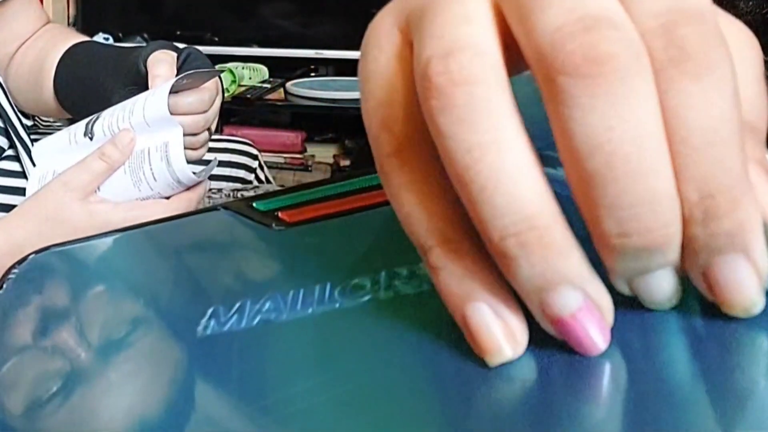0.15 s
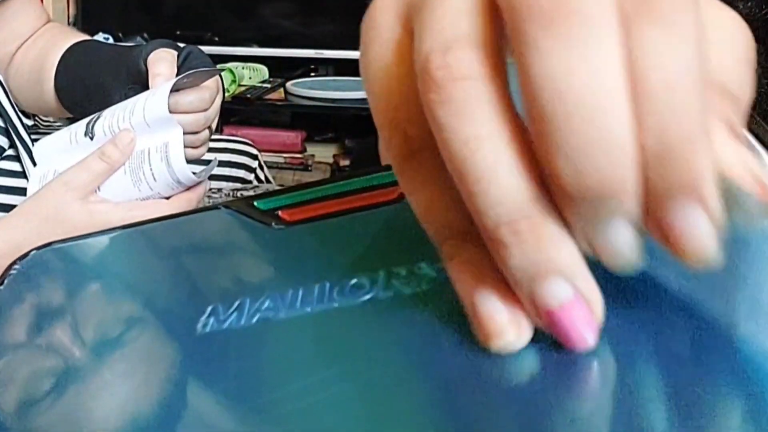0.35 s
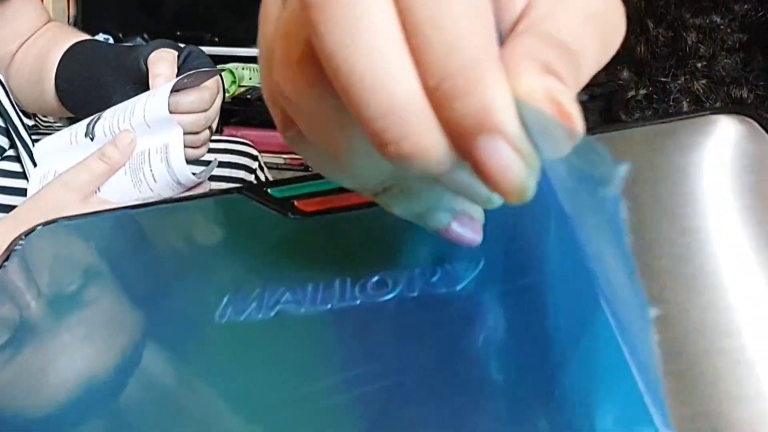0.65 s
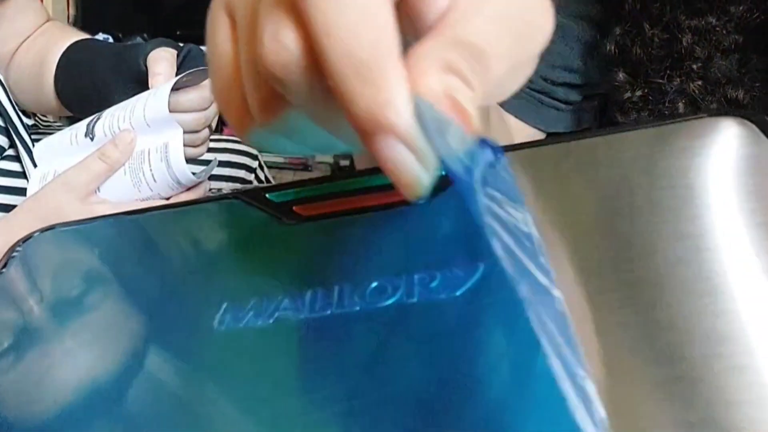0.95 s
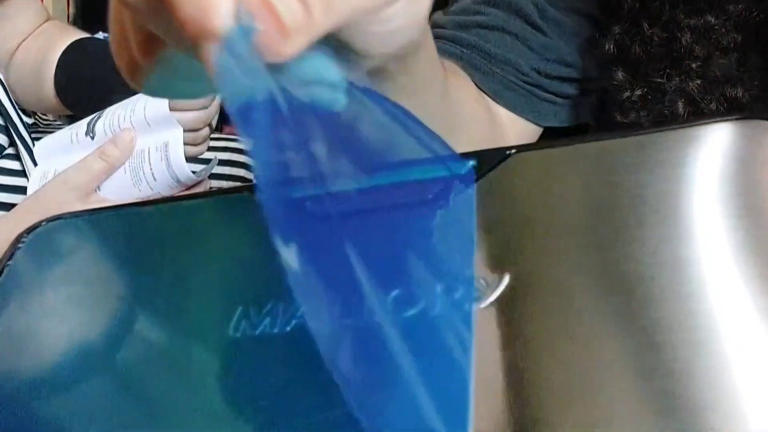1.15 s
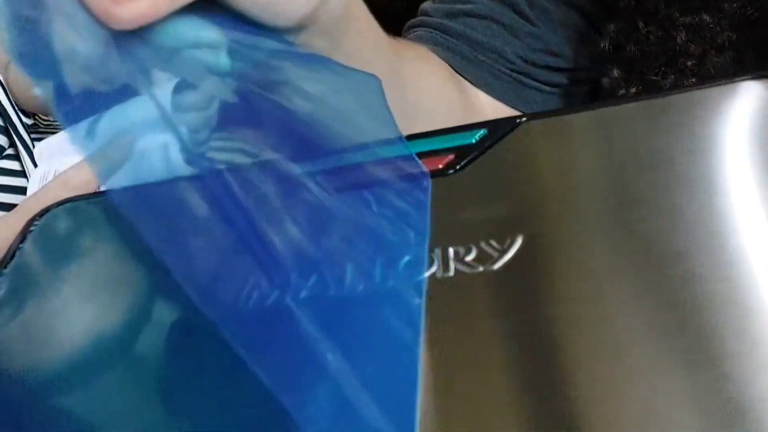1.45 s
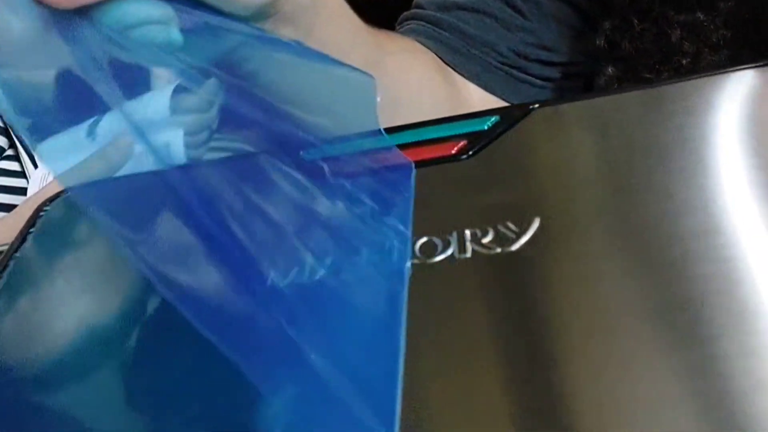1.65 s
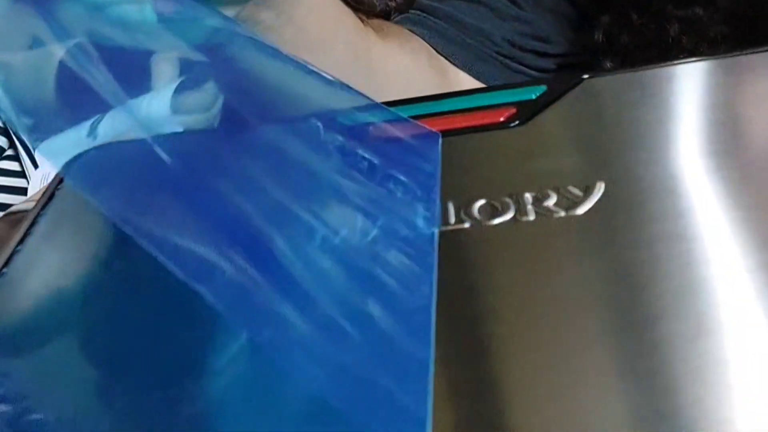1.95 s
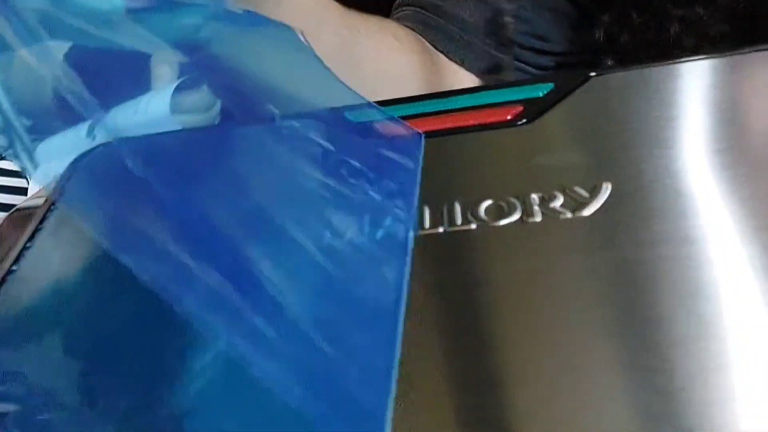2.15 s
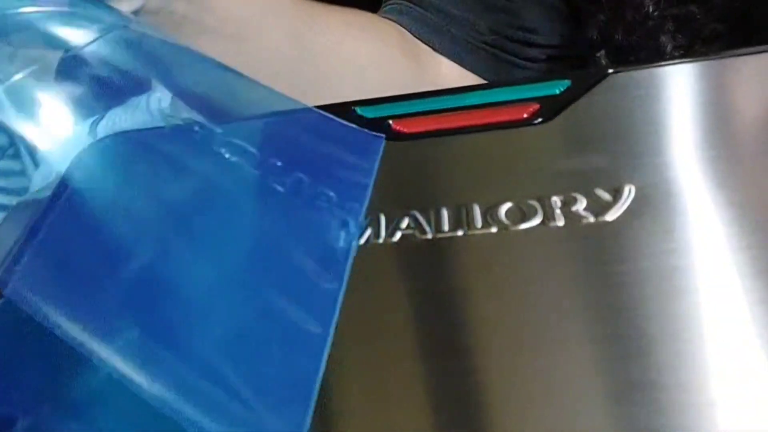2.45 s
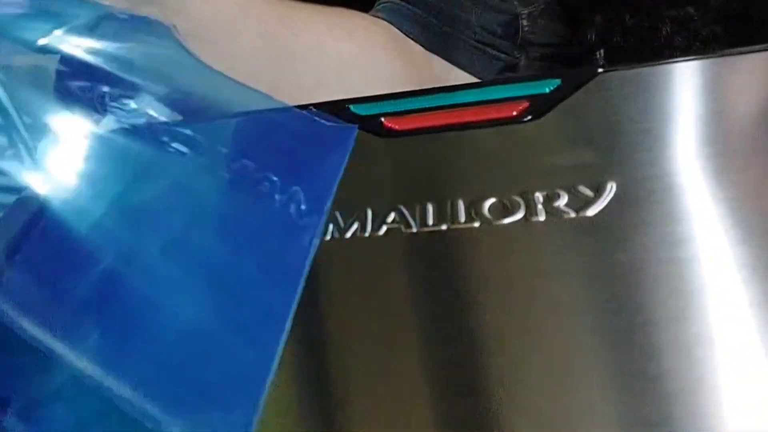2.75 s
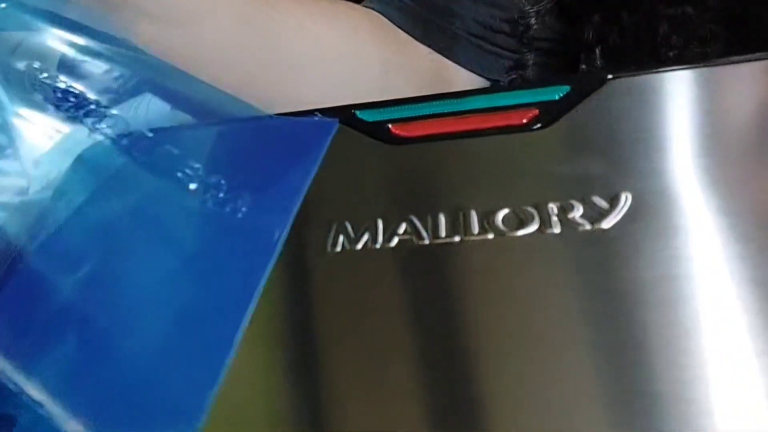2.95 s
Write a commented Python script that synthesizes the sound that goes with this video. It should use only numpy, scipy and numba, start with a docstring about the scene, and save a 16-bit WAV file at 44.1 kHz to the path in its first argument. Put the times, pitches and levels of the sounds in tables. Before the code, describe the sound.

Plastic film peels off a steel lid, close and dry in a small room. Crisp snaps from 0.1 s thicken into two quick, bright rips until 0.5 s, with a soft low thump near 0.35. After a quiet gap, a long crackling, zippy pull runs 0.9-1.4 s, falling in pitch, then a duller one to 1.85. Another rip comes at 2.1-2.5, ticking creep follows, and a final, more ringing pull spans 2.7-3.0.

```python
"""Plastic film is peeled off a steel lid, close to the microphones in a small room.
Single snaps come first, then two quick pulls and a soft thump of the lid; two long pulls follow after a pause.
A fifth pull leads to creeping with more snaps, and a sixth ends the peel. Noise makes the crackle of the glue,
moving resonators ring the lifted sheet, and the balance drifts from right of centre to slightly left.
Faint steel ringing and reflections follow the film, over a low boom of the lid and quiet room noise."""
import sys
import numpy as np
from scipy import signal
from scipy.fft import rfft, irfft, next_fast_len
from scipy.io import wavfile
from scipy.ndimage import map_coordinates
from numba import njit

SR = 44100
rng = np.random.default_rng(int(sys.argv[2]) if len(sys.argv) > 2 else 0)


def digitize_waveform(pressure):
    """Quantize a signal to 16-bit integers and store it at the path in sys.argv[1].

    Rows of a 2-D input are taken as channels; values are limited to [-1, 1].
    """
    field = np.atleast_2d(pressure).T
    bounded = np.clip(field, -1, 1)
    quanta = np.round(bounded * 32767).astype(np.int16)
    wavfile.write(sys.argv[1], SR, quanta)


N = 136710
T = np.arange(N) / SR  # time of each sample in seconds

# The pulls on the film. Each row: start in seconds, end in seconds, attack in seconds, release in seconds,
# level in dB, change of level over the pull in dB, crackle peak in Hz and in dB at the start,
# crackle peak in Hz and in dB at the end, treble in dB.
PULLS = [(.23,0.277,0.00085,.037,-24.5,4.5,4800,3,4800,6,19.5),(0.33,.517,0.021,0.035,-21.5,-14.5,3270,5.5,3680,3.5,6.5),(0.924,1.416,0.0055,0.04,-30,-1,5350,3,3220,2,5.5),(1.418,1.86,.15,0.011,-27.5,-7,2720,-4,2810,-3,2.5),(2.068,2.48,0.0085,0.052,-31,0,6200,3.5,2740,7.5,3),(2.686,3.022,0.028,0.035,-28,-6.5,4530,3,3130,2,5.5)]
# The lifted sheet. Each row: time in seconds, pitch in Hz, ring in dB (before SHEET_DB), glue slips per second.
SHEET = [(.23,1203,-9,198),(.35,896,-13,309),(.43,1062,0,260),(.49,556,2.5,270),(.93,1500,-4.5,920),(1.07,1183,2.5,876),(1.2,574,-2.5,763),(1.32,504,-6,480),(1.39,330,-5.5,270),(1.47,461,-9,110.5),(1.57,340,-12,454),(1.7,536,-6,400),(1.8,334,-5.5,105),(2.08,420,-12.5,783),(2.22,617,-10.5,700),(2.38,391.4,-12,301),(2.45,481,-4.5,183),(2.7,382,-16,317),(2.8,642,-4.5,625),(2.88,624,-1.5,525),(2.95,567,-2,398),(3.01,584,2,231)]
# The ways the sheet vibrates. Each row: multiple of its pitch, Q (before SHARPNESS), level in dB.
SHEET_MODES = [(1.002,3.2,-2.5),(2.101,2.3,-1.5),(3.2,4.3,-2)]
# The sheet rings more purely when it lies smooth than when crumpled. Each row: time in seconds, factor on Q.
SHARPNESS = [(.45,.6),(1.1,1.45),(1.7,0.8),(2.72,0.64),(2.82,3.4),(3.01,2.2)]
# The basic colour of the crackle. Each row: frequency in Hz, level in dB.
CRACKLE_COLOUR = [(100,-18),(250,-24.5),(600,-6.5),(1000,-6.5),(1550,0.5),(1900,-2),(2500,-2),(3100,-0.5),(5000,-0.5),(6200,-3),(7300,-1.5),(8400,-14),(11500,-12.5),(15500,-17.5)]
# Slow creep of the peel line between snaps. Each row: time in seconds, level in dB.
CREEP = [(2.47,-59),(2.54,-49),(2.6,-51),(2.68,-43),(2.71,-58)]
# Single snaps while the film sticks and slips. Each row: time in seconds, level in dB (before SNAP_DB).
SNAPS = [(.042,-45.5),(0.0921,-21.5),(0.1054,-24),(.119,-19.5),(.1308,-24),(0.1433,-16.5),(0.1566,-20),(0.1682,-18),(0.1712,-17.5),(.1801,-27),(0.1917,-15.5),(0.2071,-17.5),(0.2199,-20),
         (0.2281,-19),(0.2334,-13),(0.2381,-23),(0.2546,-15),(0.2645,-12.5),(0.278,-15),(.3227,-14),(0.3287,-17),(0.3363,-12.5),(.35,-8),(0.538,-47.5),(.7655,-53),
         (1.4074,-29),(1.4279,-20.5),(1.4409,-23),(1.4556,-23),(1.4756,-24),(1.4816,-24),(1.8139,-23),(1.8213,-25),(1.8402,-25.5),
         (2.0495,-28.5),(2.0541,-25.5),(2.376,-20.5),(2.3928,-24),(2.4257,-24),(2.438,-22),(2.4451,-23),(2.4531,-20),
         (2.5035,-25),(2.5195,-27),(2.5219,-20),(2.5456,-23),(2.5608,-22),(2.5636,-23.5),(2.5732,-24),(2.589,-28),(2.5913,-18),(2.594,-27),(2.6011,-28.5),
         (2.615,-21),(2.6221,-25.5),(2.6235,-20.5),(2.629,-24),(2.6493,-20.5),(2.652,-29),(2.6675,-18.5),(2.6719,-22),(2.687,-17),(2.6929,-26),(2.6955,-21.5)]
# The basic colour of a snap. Each row: frequency in Hz, level in dB.
SNAP_COLOUR = [(100,-29.5),(300,-11.5),(1000,-7),(1900,-5.5),(3700,-3),(5000,-3.5),(7000,-0.5),(8400,-13.5),(14000,-15),(16000,-17.5)]
# How the film colours the snaps. Each row: time in seconds, resonance in Hz, resonance in dB, treble in dB.
SNAP_TONE = [(.04,2500,15,-16),(.09,2820,6.5,-0.5),(.22,2950,5,1),(.235,4540,7.5,8),(.33,2900,9.5,5),(.54,6430,2,15.5),(1.43,6470,-2.5,-2),(2.05,2680,4,-0.5),(2.6,2520,4.5,-5)]
# Place of the peel line. Each row: time in seconds, lag of the right ear in ms, left minus right in dB.
PLACE = [(0,0.37,-0.5),(.35,0.29,-1),(.95,0.18,-3.5),(1.3,0.14,-1),(1.8,0.12,0.5),(2.4,0.088,1),(3.1,0.0097,2)]
# Ring of the steel plate under the peel. Each row: frequency in Hz, level in dB.
PLATE_MODES = [(337,-2),(544,0),(638,6),(1070,7),(1260,1.5),(1610,-0.5),(2490,-15),(2810,-13.5)]
# How strongly the peel drives the plate, weakening near the end. Each row: time in seconds, level in dB.
PLATE_DRIVE = [(2.7,-15.5),(2.82,-16),(3,-20.5)]
# How sound dies away in the room. Each row: frequency in Hz, time to fall by 60 dB in seconds.
ROOM = [(200,0.31),(1000,0.16),(4000,0.13),(14000,0.078)]
# Handling of the lid. Each row: time in seconds, level of the bass in dB.
HANDLING = [(0,-54.5),(.13,-50.5),(.3,-53),(.42,-47.5),(.53,-65),(.63,-53.5),(.85,-59.5),(1.05,-54.5),(1.35,-49.5),(1.62,-55),(1.8,-50.5),(2,-56),(2.3,-52),(2.44,-47.5),(2.6,-49.5),(2.98,-46),(3.1,-61.5)]
# Colour of the lid's boom. Each row: frequency in Hz, level in dB.
BOOM = [(20,-49),(35,-24),(60,6),(78,5),(110,-1),(160,-22),(300,-42)]
# Tones of the lid's thump. Each row: frequency in Hz, level in dB, time to fall by 60 dB in seconds.
LID_MODES = [(80,0.5,0.1),(124.7,2.5,0.1),(205.3,-3.5,.12),(320,-1,0.084)]
# Colour of the room noise. Each row: frequency in Hz, level in dB.
AIR = [(88, -19.5), (150, -1.5), (308, -8), (396, -20.5), (561, -11), (766, -17), (1660, -24),
       (2810, -31.5), (15500, -37)]

# Glue slips: fade time of a burst's power (s), random timing (share of the gap between slips), level spread
SLIP_S, SLIP_SCATTER, SLIP_SPREAD_DB = 0.00028, .3, 1
SLIP_DB, SLIP_CLICK_DB = 0, -7.5  # burst of fibres in a slip, sharp release that starts it
FIBRES_PER_S, FIBRE_SPREAD_DB, FIZZ_DB = 12000, 2.5, -2
CRACKLE_DB, SHEET_DB = 2, -1.5
LINE_SPREAD = 1  # weight of the sound from along the peel line, unlike in each ear
SHEET_WIDTH = 10  # weight of the part of the ring unlike in each ear, next to the shared part
SNAP_DB, SNAP_S, SNAP_TAIL_DB = 10.5, .0005, -11.5  # SNAP_S: fade time of the spray in seconds
PEAK_OCTAVES, TREBLE_HZ = 0.32, 9500  # width of the film's resonance, corner of the treble shelf
PLATE_T60_S = .13  # time for the plate to fall by 60 dB
ROOM_DB, NEAR_DB, NEAR_T60_S = -10, -5, 0.014
THUMP_S, THUMP_DB = .349, -30.5
AIR_DB = -65
TOP_HZ = 16000


def peeling():
    """Breaking glue crackles and rings the sheet; each pull rises, changes colour and stops."""
    pitch, ring_db, slip_rate = curves(SHEET)
    force = glue(slip_rate)
    ring = sheet_ring(pitch, ring_db, slip_rate)
    creep_colour = tone(peak_hz=2400, peak_db=4, treble_db=-9)
    out = gains(CREEP)[0] * colour(force, CRACKLE_COLOUR, creep_colour)
    for (start, end, attack, release, db, change_db,
         first_hz, first_db, last_hz, last_db, treble_db) in PULLS:
        rise = np.clip((T - start) / attack, 0, 1)
        fall = np.clip((end - T) / release, 0, 1)
        progress = np.clip((T - start) / (end - start), 0, 1)
        first = colour(force, CRACKLE_COLOUR, tone(first_hz, first_db, treble_db))
        last = colour(force, CRACKLE_COLOUR, tone(last_hz, last_db, treble_db))
        crackle = (1 - progress) * first + progress * last
        level = rise * fall * amp(db + change_db * progress)
        out = out + level * (amp(CRACKLE_DB) * crackle + ring)
    return out


def glue(rate):
    """Glue fibres break in a steady fizz, and with a click and a burst at each slip."""
    turns = np.cumsum(rate) / SR  # slips counted so far
    k = np.arange(int(turns[-1]))
    chance = rng.standard_normal((4000, 2))[k]
    at = np.minimum(np.searchsorted(turns, k + SLIP_SCATTER * chance[:, 0]), N - 1)
    # dividing by the rate makes each slip weaker when slips are dense
    slip_power = np.bincount(at, amp(SLIP_SPREAD_DB * chance[:, 1]) ** 2 / rate[at], N)
    bursts = unit(np.sqrt(signal.lfilter([1], [1, -np.exp(-1 / (SLIP_S * SR))], slip_power)))
    breaks = rng.random((3, N)) < FIBRES_PER_S / SR
    fibres = breaks * amp(FIBRE_SPREAD_DB * rng.standard_normal((3, N)))
    fibres *= np.sign(rng.standard_normal((3, N)))
    clicks = unit(np.sqrt(slip_power) * np.sign(rng.standard_normal(N)))
    fibre_level = np.hypot(amp(FIZZ_DB), amp(SLIP_DB) * bursts)
    return unit(amp(SLIP_CLICK_DB) * clicks + ears(fibres, LINE_SPREAD) * fibre_level)


def sheet_ring(pitch, ring_db, slip_rate):
    """Glue noise shakes the sheet at a moving pitch, mostly in its lowest mode when it lies smooth."""
    sharp, = curves(SHARPNESS)
    ring = 0
    for multiple, q, db in SHEET_MODES:
        step = 2 * np.sin(np.pi * multiple * pitch / SR)
        mode = np.array([resonate(ear, step, q * sharp) for ear in glue(slip_rate)])
        ring = ring + amp(db) / np.maximum(sharp, 1) ** (1.2 * (multiple - 1)) * mode
    ring = cut(ring.mean(axis=0) + SHEET_WIDTH * ring, 220, "high")
    return amp(SHEET_DB + ring_db) * unit(ring)


def snaps():
    """Each snap is one sharp release within a brief spray of fibres, coloured by the film it pulls on."""
    out = np.zeros((2, N + SR))
    t = np.arange(SR // 100) / SR
    film = np.array(curves(SNAP_TONE))
    for s, db in SNAPS:
        at = round(s * SR)
        noise = ears(rng.standard_normal((3, len(t))), LINE_SPREAD)
        spray = amp(SNAP_TAIL_DB) * noise * np.exp(-t / SNAP_S)
        spray[:, np.argmax(t > SNAP_S / 2)] = 1  # the sharp release, alike in both ears
        snap = colour(spray, SNAP_COLOUR, tone(*film[:, at]), size=2048)
        out[:, at:at + snap.shape[1]] += amp(SNAP_DB + db) * snap
    return out[:, :N]


def plate(x):
    """The steel plate rings faintly with the peel, as a sum of fading sine waves."""
    t = np.arange(SR // 3) / SR
    ring = sum(amp(db - 60 * t / PLATE_T60_S) * np.sin(2 * np.pi * hz * t) for hz, db in PLATE_MODES)
    drive = x.mean(axis=0) * amp(curves(PLATE_DRIVE)[0])
    return convolve(drive, ring / np.linalg.norm(ring))


def reflections(x, count=20):
    """Nearby things answer briefly and the room lingers; new patterns stand for the moving hand and film."""
    out = np.zeros((2, N + SR))
    hop = N // count + 1
    for start in range(0, N, hop):
        hz, t, z = signal.stft(rng.standard_normal((2, SR // 4)), SR, nperseg=256)
        fade = amp(-60 * t / along(ROOM, hz)[:, None])
        tail = signal.istft(z * fade, SR, nperseg=256)[1]
        t = np.arange(tail.shape[1]) / SR
        near = rng.standard_normal(tail.shape) * amp(-60 * t / NEAR_T60_S) * (t > .0007)
        answer = amp(ROOM_DB) * tail / np.linalg.norm(tail[0])
        answer = answer + amp(NEAR_DB) * near / np.linalg.norm(near[0])
        wet = signal.fftconvolve(x[:, start:start + hop], answer, axes=1)
        out[:, start:start + wet.shape[1]] += wet
    return out[:, :N]


def lid():
    """The held lid booms softly as low noise and thumps once, in fading sines, as the film gives way."""
    noise = ears(rng.standard_normal((3, N)), spread=0.53)
    boom = unit(cut(colour(noise, BOOM), 170, "low", order=4))
    t = np.maximum(T - THUMP_S, 0)
    modes = sum(amp(db - 60 * t / t60) * np.sin(2 * np.pi * hz * t) for hz, db, t60 in LID_MODES)
    thump = (1 - np.exp(-t / 0.017)) * modes  # a soft start
    both = amp(curves(HANDLING)[0]) * boom + amp(THUMP_DB) * thump
    return both * amp([[-1.1], [1.1]])  # a little to the right


def room_air():
    """Quiet room noise is steady random noise, filtered to its colour."""
    noise = ears(rng.standard_normal((3, N)), spread=1.0)
    return amp(AIR_DB) * unit(cut(colour(noise, AIR), 110, "high"))


def amp(db):
    """Decibels to gain."""
    return 10 ** (np.asarray(db) / 20)


def unit(x):
    """Scale to an rms level of 1."""
    return x / np.sqrt(np.mean(x ** 2) + 1e-20)


def along(points, hz):
    """Read between (Hz, value) points on a log frequency axis."""
    f, v = np.transpose(points)
    return np.interp(np.log(hz + 1), np.log(f + 1), v)


def curves(rows):
    """One value per sample for each column after the time."""
    s, *cols = np.transpose(rows)
    return [np.interp(T, s, c) for c in cols]


def gains(rows):
    """Level curves as gains, silent outside their span."""
    return [amp(c) * (T >= rows[0][0]) * (T <= rows[-1][0]) for c in curves(rows)]


def convolve(x, response):
    """Each channel through an impulse response."""
    return signal.fftconvolve(np.atleast_2d(x), np.atleast_2d(response), axes=1)[:, :N]


def colour(x, points, shape_db=lambda hz: 0, size=8192):
    """A filter of unit energy with the given spectrum and an optional extra shape."""
    hz = np.fft.rfftfreq(size, 1 / SR)
    # folding the cepstrum (the transform of the log spectrum) puts the response after its cause
    cepstrum = irfft(np.log(amp(along(points, hz) + shape_db(hz))))
    cepstrum[1:size // 2] *= 2
    cepstrum[size // 2 + 1:] = 0
    response = irfft(np.exp(rfft(cepstrum)))
    return convolve(x, response / np.linalg.norm(response))


def tone(peak_hz, peak_db, treble_db):
    """A broad resonance of the film and a treble shelf, as dB over frequency."""
    def shape_db(hz):
        octaves = np.log2((hz + 1) / peak_hz)
        peak = peak_db * np.exp(-.5 * (octaves / PEAK_OCTAVES) ** 2)
        return peak + treble_db / (1 + (TREBLE_HZ / (hz + 1)) ** 4)
    return shape_db


def cut(x, hz, kind, order=2):
    """Low-pass or high-pass."""
    return signal.sosfilt(signal.butter(order, hz, kind, fs=SR, output="sos"), x)


def ears(x, spread):
    """Three signals (shared, left only, right only) to stereo."""
    return (x[0] + spread * x[1:]) / np.sqrt(1 + spread ** 2)


@njit
def resonate(x, step, q):
    """A band-pass whose centre moves, like a vibrating body whose tautness changes."""
    y = np.zeros(len(x))
    low = band = 0.
    for i in range(len(x)):
        low += step[i] * band
        band += step[i] * (x[i] - low - band / q[i])
        y[i] = band / np.sqrt(step[i] * q[i])
    return y


def scene():
    """The film at its moving place, the plate, the reflections, the lid and the room noise."""
    lag_ms, pan_db = curves(PLACE)
    left, right = peeling() + snaps()
    right = map_coordinates(right, [np.arange(N) - lag_ms * SR / 1000])
    film = np.array([left * amp(pan_db / 2), right * amp(-pan_db / 2)])
    return film + plate(film) + reflections(film) + lid() + room_air()


def record(dry):
    """Fade out the spectrum over 500 Hz around TOP_HZ; nothing above that is kept."""
    m = next_fast_len(N + SR // 2)
    keep = np.clip((TOP_HZ - np.fft.rfftfreq(m, 1 / SR)) / 500 + .5, 0, 1)
    return irfft(rfft(dry, m) * keep, m)[:, :N]


dry = scene()
out = record(dry)
digitize_waveform(out)
```